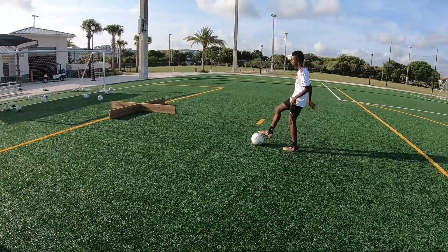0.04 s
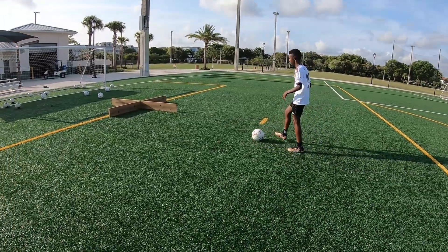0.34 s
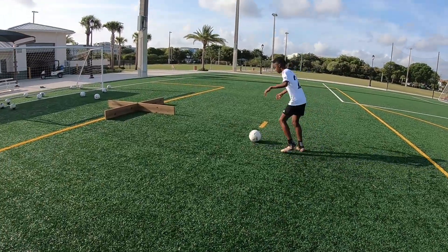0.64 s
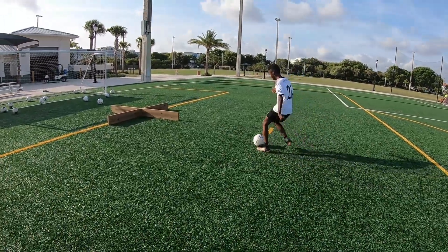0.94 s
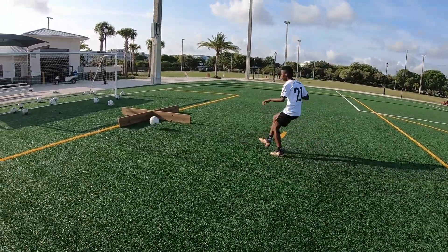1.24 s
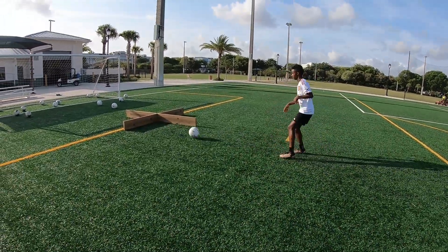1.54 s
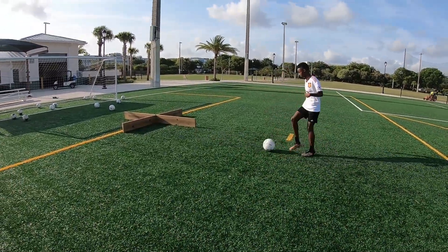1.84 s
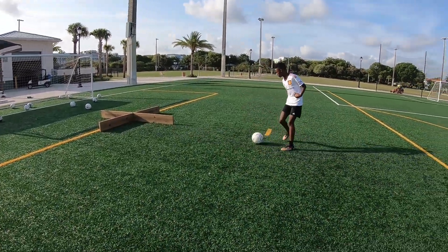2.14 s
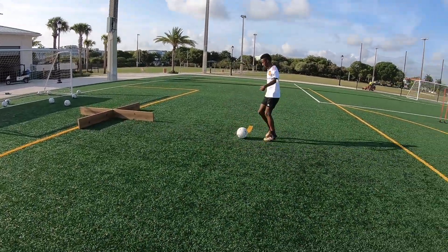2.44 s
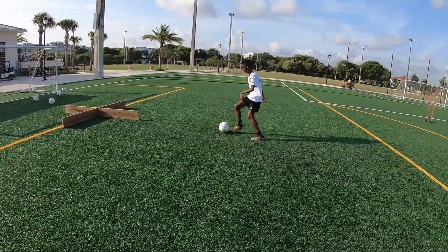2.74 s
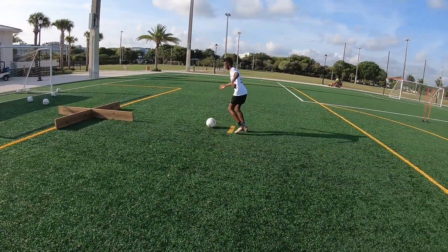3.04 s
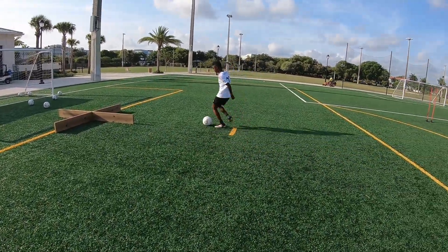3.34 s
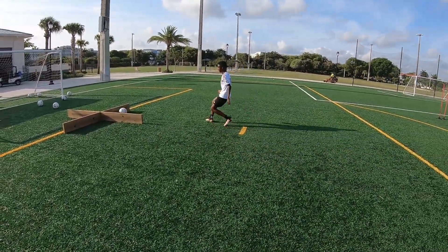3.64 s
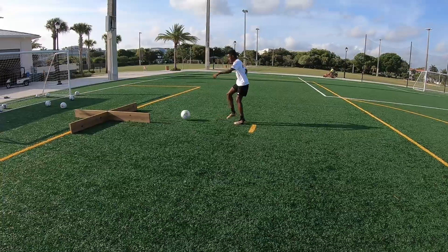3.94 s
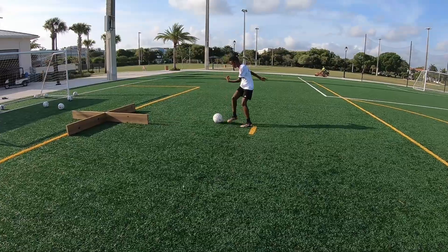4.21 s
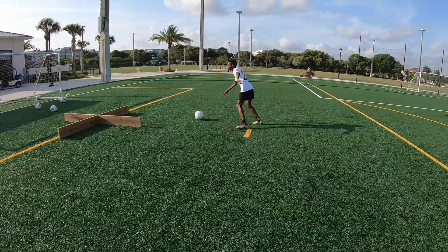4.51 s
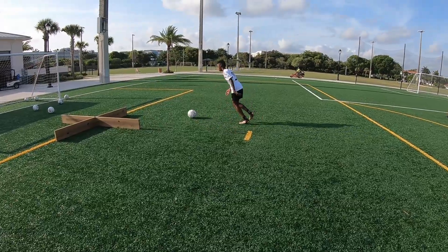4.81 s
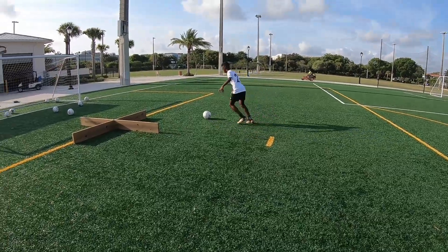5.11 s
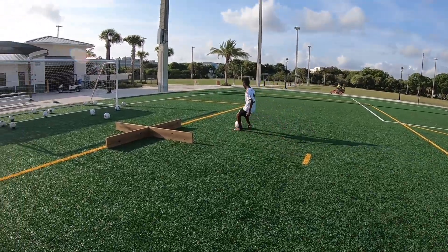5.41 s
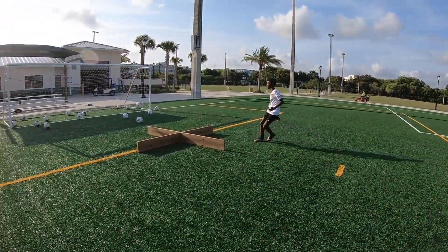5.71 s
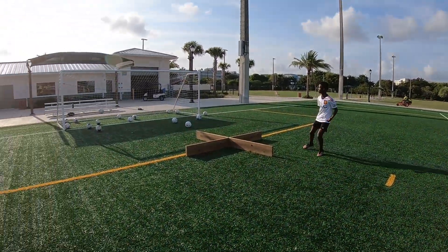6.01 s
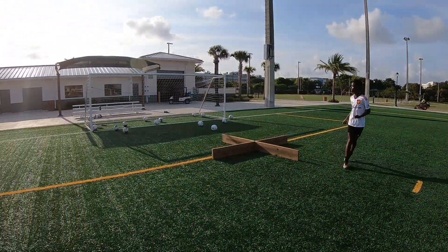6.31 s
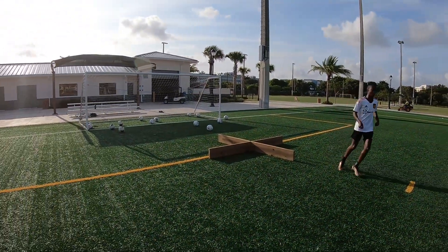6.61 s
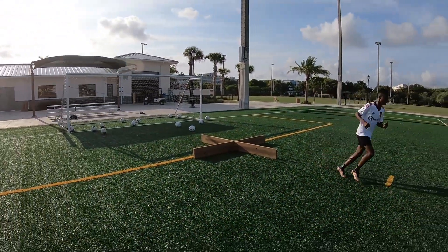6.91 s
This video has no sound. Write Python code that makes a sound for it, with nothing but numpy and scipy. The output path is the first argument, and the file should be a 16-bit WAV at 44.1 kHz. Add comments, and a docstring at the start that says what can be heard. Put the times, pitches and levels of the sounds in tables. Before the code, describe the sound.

Sharp ball kicks and two hollow wooden booms sound outdoors, with soft footsteps, gusting wind and a faraway mower.

```python
"""A football is kicked against a wooden rebound board, which booms and rattles; the player traps the return.
Each touch is a slap on the ball's skin and a short thump as it squashes. Faint echoes follow the booms.
Shoes brush and thud on the artificial turf. Across the field a mower hums, whines and clatters over
the murmur of a distant town, while gusts of wind rumble on the microphone."""
import sys
import numpy as np
from scipy import signal
from scipy.fft import rfft, irfft
from scipy.io import wavfile
from scipy.ndimage import uniform_filter1d

SR = 44100
rng = np.random.default_rng(int(sys.argv[2]) if len(sys.argv) > 2 else 0)


def store_wav(level_fs):
    """Save 16-bit WAV to argv[1]."""
    pcm = np.round(np.clip(np.atleast_2d(level_fs), -1, 1) * 32767)
    wavfile.write(sys.argv[1], SR, pcm.T.astype(np.int16))


N = 306936
TIME = np.arange(N) / SR


# Touches of the ball. Each row: start in seconds, thump level in dB, thump pitch in Hz, swell time in
# seconds, hollow ring in dB, slap level in dB, slap's low edge in Hz, its high edge in Hz,
# the tick's lower note in Hz, its boost in dB, the upper note in Hz, its boost in dB.
BALL_TOUCHES = [(1.1240, -15, 133, 0.0076, -38, -26, 900, 6300, 3960, 8, 6300, 3),
                (1.4397, -13, 144, 0.0057, -26.5, -11.5, 700, 3700, 2130, 4, 4450, 8.5),
                (1.5360, -19, 195, 0.0051, -33, -57, 1000, 2000, 2000, 0, 4000, 0),
                (2.043, -33, 98, 0.005, -64, -38.5, 1000, 6000, 1900, 9, 5700, 11),
                (3.5319, -16.5, 143, 0.0085, -40, -28.5, 2200, 9100, 4050, 7, 5400, 4),
                (3.797, -8.5, 158, 0.0079, -27, -19, 400, 7300, 1750, 10.5, 7300, -2.5),
                (4.2690, -29, 91, 0.008, -40.5, -32, 3400, 6400, 2570, 16, 4600, 2),
                (5.5666, -18.5, 123, 0.0071, -30.5, -22, 1900, 6400, 2630, 7, 3500, 10.5)]
# Tone of shoe or wood on the ball's skin. Each row: frequency in Hz, level in dB.
SLAP_COLOUR = [(300, -16), (900, -32.5), (1200, 11), (1850, 9), (2500, 4), (3300, -2), (4400, 0.5),
               (6000, -2.5), (9000, -12.5), (11000, -29), (13000, -7), (16000, -21)]
# The ball's hollow ring. Each row: pitch in Hz, level in dB, seconds to fade by 60 dB.
HOLLOW_NOTES = [(395, 6.5, 0.023), (480, -7, 0.11), (599, -11, 0.11)]

def ball(squash_turns=0.6, squash_s=0.0021, scuff_db=-21.5, scuff_s=0.0064, tick_width_hz=600):
    """The skin slaps and scuffs, then the ball squashes and springs back in a few swings."""
    out, t = np.zeros(N), np.arange(4096) / SR
    hz = np.fft.rfftfreq(len(t), 1 / SR)
    hollow = sum(ring(t, *note) for note in HOLLOW_NOTES)
    for start, thump_db, pitch, swell, hollow_db, slap_db, low, high, *tick_notes in BALL_TOUCHES:
        turns = pitch * t + squash_turns * (1 - np.exp(-t / squash_s))  # the first swing is the quickest
        thump = t / swell * np.exp(.5 - .5 * (t / swell) ** 2) * np.sin(2 * np.pi * turns)
        contact = (t == 0) + amp(scuff_db) * np.exp(-t / scuff_s) * rng.standard_normal(len(t))
        lower, lower_db, upper, upper_db = tick_notes
        tick = amp(lower_db * bell(hz, lower, tick_width_hz) + upper_db * bell(hz, upper, tick_width_hz))
        band = cut_bass(hz, low) * cut_treble(hz, high, steepness=3)
        click = sharpest_click(colour(SLAP_COLOUR, hz) * tick * band)
        slap = signal.fftconvolve(contact, click / abs(click).max())[:len(t)]
        add(out, start, amp(thump_db) * thump + amp(hollow_db) * hollow + amp(slap_db) * slap)
    return out


# Blows on the board. Each row: start in seconds, force in dB, high edge in Hz, plank (0 or 1).
BOARD_BLOWS = [(1.4460, 0, 2530, 0), (1.562, 3, 195, 0), (3.8, 1.5, 2500, 1)]
# The board's natural notes. Each row: pitch in Hz, seconds to fade by 60 dB,
# level in dB when plank 0 is hit, level in dB when plank 1 is hit.
BOARD_NOTES = [(163.2, 0.25, -20, -20), (195, 0.36, -28.5, -22), (226, 0.15, -13.5, -4.5),
               (246.4, 0.38, -24, -23.5), (340, 0.27, -22.5, -16.5), (430, 0.2, -19.5, -19),
               (450, 0.56, -29, -36), (491, 0.14, -26.5, -29), (564, 0.1, -25, -22), (633, 0.11, -35, -23),
               (676, 0.29, -31.5, -41), (662, 0.17, -35, -23.5), (700, 0.27, -30.5, -29),
               (829, 0.2, -43, -24), (880, 0.15, -47, -23), (895, 0.099, -32, -30),
               (1149, 0.21, -45, -31.5), (1270, 0.16, -48, -26.5), (1300, 0.16, -40, -36.5),
               (1320, 0.23, -42, -32), (1378, .14, -51, -35), (1720, 0.11, -54, -39),
               (1970, 0.14, -50, -47), (2200, .13, -63, -47.5)]

def board(rise_s=0.03, rise_corner_hz=330):
    """The planks ring as the ball leans in, high notes first; where and how hard it hits sets the mix."""
    out, t = np.zeros(N), np.arange(SR) / SR
    for start, force_db, high, plank in BOARD_BLOWS:
        for hz, fade_s, *plank_db in BOARD_NOTES:
            swell = 1 - np.exp(-t / rise_s * (1 + hz / rise_corner_hz))
            note = ring(t, hz, force_db + plank_db[round(plank)], fade_s)
            add(out, start, swell * note * cut_treble(hz, high, steepness=4))
    return out


# Knocks after a blow. Each row: start in seconds, level in dB, high edge in Hz.
PLANK_KNOCKS = [(1.457, -23, 750), (1.477, -30, 480), (1.533, -28, 560), (1.584, -32, 520),
                (1.63, -28, 230), (3.806, -21, 1360), (3.836, -19, 600), (3.864, -22, 430),
                (3.889, -29.5, 555), (3.922, -25.5, 240)]

def rattles(low_hz=150, fade_s=0.12, rise_s=0.0073):
    """Loose planks knock together, each knock a quickly dying burst of dull noise."""
    out, t = np.zeros(N), np.arange(SR // 4) / SR
    envelope = (1 - np.exp(-t / rise_s)) * fade(t, fade_s)
    for start, db, high in PLANK_KNOCKS:
        wood = noise(lambda f: cut_bass(f, low_hz) * cut_treble(f, high, steepness=4), size=len(t))
        add(out, start, amp(db) * wood * envelope)
    return out


# Echoes of the board. Each row: start in seconds, level in dB, pitch in Hz,
# climb in Hz per second, width in Hz, length in seconds.
FAR_ECHOES = [(1.689, -47.5, 504, 903, 40.2, 0.075), (1.769, -53.5, 560, 1302, 70, .11),
              (4.045, -39.5, 376, -1000, 90.5, 0.0336)]

def echoes():
    """The far side of the field returns the boom as faint smears of gliding pitch."""
    out = np.zeros(N)
    for start, db, hz, climb, width, length in FAR_ECHOES:
        t = np.arange(0, length, 1 / SR)
        blur = narrow_noise(hz, width, size=SR)[:len(t)]
        glide = (signal.hilbert(blur) * np.exp(1j * np.pi * climb * t ** 2)).real
        add(out, start, amp(db) * unit(glide) * signal.windows.tukey(len(t), .5))
    return out


# Heavy steps. Each row: start in seconds, level in dB, pitch in Hz, swell time in seconds.
HEAVY_STEPS = [(2.926, -24.5, 99, 0.0039), (4.488, -19.5, 166, .0026), (4.521, -24.5, 176, 0.0085),
               (4.695, -28, 183, 0.005), (4.822, -26.5, 162, .0065), (4.915, -22.5, 173, 0.006),
               (5.258, -28, 440, 0.0011), (5.884, -24.5, 175.6, 0.0086), (6.885, -26, 106, 0.0077)]

def footfalls():
    """The padded ground gives under a planted foot: a soft, low thud."""
    out, t = np.zeros(N), np.arange(SR // 4) / SR
    for start, db, pitch, swell in HEAVY_STEPS:
        envelope = t / swell * np.exp(1 - t / swell)
        add(out, start, amp(db) * envelope * np.sin(2 * np.pi * pitch * t))
    return out


# Sliding shoes. Each row: start in seconds, brush level in dB, length in seconds, scrape level in dB.
SHOE_SLIDES = [(0.2, -65.5, 0.73, -79), (1.11, -63, 0.2, -85), (2.475, -61.5, 0.38, -66),
               (3.2, -60, 0.61, -72), (3.82, -59.5, 0.47, -70), (4.424, -55, 0.35, -54.5),
               (4.78, -61, 0.3, -62), (5.03, -57.5, 0.26, -70), (5.275, -61, 0.2, -66),
               (5.74, -57, 0.17, -56.5), (5.954, -60, 0.31, -81), (6.276, -59, 0.12, -51),
               (6.44, -66, 0.18, -61.5), (6.59, -68, 0.13, -52.5), (6.78, -68, 0.19, -57.5)]
# Tone of the brushed grass and of the scraping studs. Each row: frequency in Hz, level in dB.
GRASS_COLOUR = [(600, -10), (2000, -11), (3300, 0.5), (4600, 12.5), (5400, 6), (7000, 2), (9500, -14.5),
                (11200, -28), (12400, -13), (15500, -24)]
STUD_COLOUR = [(500, -14), (1000, 1), (1900, 1), (2900, -0.5), (4000, -4), (6000, -15.5), (11000, -37.5)]

def shoe_scuffs(flicks_per_s=1700, spread_db=1.0):
    """Plastic grass blades flick back under a shoe, while its studs scrape the grains between them."""
    brush, scrape = np.zeros(N), np.zeros(N)
    for start, brush_db, length, scrape_db in SHOE_SLIDES:
        press = np.hanning(round(length * SR))
        add(brush, start, amp(brush_db) * press)
        add(scrape, start, amp(scrape_db) * press)

    def crackle(tone):
        strength = amp(spread_db * np.minimum(rng.exponential(1, N), 4)) * rng.standard_normal(N)
        flicks = strength * (rng.random(N) < flicks_per_s / SR)
        return filtered(flicks, lambda f: colour(tone, f))
    return brush * crackle(GRASS_COLOUR) + scrape * crackle(STUD_COLOUR)


# Tones of the exhaust and the gears. Each row: multiple of the engine's firing rate, level in dB.
EXHAUST_TONES = [(2, -25.5), (4, -14), (5, -2), (7, -18.5), (8, -12.5), (10, -18), (12, -18)]
GEAR_TONES = [(53, -25), (54, -7), (72, -18.5)]
# Tone of the hiss. Each row: frequency in Hz, level in dB.
HISS_COLOUR = [(1500, -24.5), (3300, 2.5), (5100, 13.5), (6500, -2), (8000, -8.5), (9900, -11),
               (10800, -19), (12200, -10), (15500, -23.5)]
# How each part of the mower swells and fades. Each row: time in seconds, level in dB.
EXHAUST_LEVELS = [(0, -38), (.8, -40.5), (1.3, -53), (2, -51), (2.8, -56), (3.4, -45), (4.6, -44.5),
                  (5.8, -44.5), (6.96, -38.5)]
GEAR_LEVELS = [(0, -68), (1.2, -68.5), (1.7, -56.5), (2.2, -60), (3, -57.5), (5.5, -56.5), (6, -59),
               (6.96, -91)]
HISS_LEVELS = [(0, -69), (4.3, -83), (4.6, -65), (4.8, -72), (5.62, -67), (5.78, -59), (6.1, -58.5),
               (6.66, -59), (6.76, -82), (6.96, -63)]
CLATTER_LEVELS = [(0, -67.5), (1.3, -59.5), (1.6, -54.5), (2.05, -54.5), (2.25, -57), (2.8, -56),
                  (4.3, -55.5), (5.3, -52.5), (5.9, -52), (6.08, -55), (6.25, -52.5), (6.45, -49.5),
                  (6.96, -54)]

def mower(firing_hz=30.24, wobble=0.00129, gear_rough=0.3, puff_db=-4.0, muffler_hz=172):
    """The engine's firing sets the exhaust hum, the gear whine and the throb of hiss and clatter."""
    turns = np.cumsum(firing_hz * (1 + wobble * drift(2.94))) / SR
    throb = amp(1.8 * np.tanh(5 * np.cos(2 * np.pi * turns)))  # louder for half of each cycle
    puffs = amp(puff_db) * throb * narrow_noise(muffler_hz, half_width_hz=45)  # gas swirls in the muffler
    exhaust = (engine_tones(turns, EXHAUST_TONES, waver=0.3) + puffs) * level(EXHAUST_LEVELS)
    gears = engine_tones(turns, GEAR_TONES, waver=0.15)
    whine = gears * throb * (1 + gear_rough * drift(78)) * level(GEAR_LEVELS)
    hiss = unit(noise(lambda f: colour(HISS_COLOUR, f)) * throb) * level(HISS_LEVELS)
    clatter = unit(casing() * throb) * level(CLATTER_LEVELS)
    return exhaust + whine + hiss + clatter


def engine_tones(turns, tones, waver):
    """Wavering tones at multiples of the firing rate."""
    out = np.zeros(N)
    for multiple, db in tones:
        strength = amp(db) * (1 + waver * drift(4.2))
        out += strength * np.cos(2 * np.pi * (round(multiple) * turns + rng.random()))
    return np.sqrt(2) * out


# Tone of the clatter. Each row: frequency in Hz, level in dB.
CLATTER_COLOUR = [(500, 6.5), (1200, 8.5), (1750, 9), (2200, 2), (3450, -0.5), (4200, 3.5), (5300, 1.5),
                  (6500, -7), (8200, -11.5), (10000, -25), (11200, -38), (12400, -25.5), (15500, -37)]
# Where the mower's casing rings. Each row: pitch in Hz, width in Hz, boost in dB.
CASING_PEAKS = [(1794, 130, 2.5), (2550, 480, 4), (4070, 420, 4), (5560, 180, -0.5), (6100, 120, 6),
                (6500, 83, 7.5), (7660, 200, 2.5)]

def casing(ripple_depth_db=3.5, full_ripple_hz=3000):
    """Noise rings in the casing, with fine ripples in its tone that shift as the mower moves."""
    hz, _, slices = to_slices(rng.standard_normal(N), size=1024)
    boost_db = sum(db * bell(hz, centre, width) for centre, width, db in CASING_PEAKS)
    tone = colour(CLATTER_COLOUR, hz) * amp(boost_db)
    ripple = uniform_filter1d(rng.standard_normal(slices.shape), size=2, axis=0)  # smooth across pitch
    ripple = unit(uniform_filter1d(ripple, size=170, axis=1))  # and across time
    ripple_db = ripple_depth_db * np.minimum(hz / full_ripple_hz, 1) * ripple
    return from_slices(slices * tone * amp(ripple_db), size=1024)


# How the squeal grows. Each row: time in seconds, level in dB.
SQUEAL_LEVELS = [(0, -87.5), (4.3, -69), (6.4, -69), (6.7, -63.5), (6.96, -61)]

def squeal(pitch_hz=3100):
    """A thin, fuzzy whistle from the mower."""
    return narrow_noise(pitch_hz, half_width_hz=26) * level(SQUEAL_LEVELS)


# Gusts. Each row: time in seconds, level in dB, high edge of the rumble in Hz.
GUSTS = [(0, -64, 90), (.68, -52, 89.5), (.86, -42, 100), (1.08, -40.5, 109.5), (1.3, -45, 110),
         (2, -43.5, 110), (2.2, -48, 109), (2.94, -32.5, 129), (3.06, -47.5, 169), (3.5, -34, 240),
         (3.63, -42.5, 210), (3.76, -30, 225), (3.97, -37, 191), (4.18, -39, 196), (4.3, -35, 286),
         (4.43, -39.5, 224), (4.6, -34, 283), (4.68, -48, 170), (4.86, -40, 169), (4.98, -29.5, 254),
         (5.15, -31.5, 259), (5.27, -29, 350), (5.34, -33, 260), (5.45, -34, 260), (5.66, -44, 161),
         (5.8, -36, 190), (6.05, -37, 195), (6.22, -35, 149), (6.4, -46, 150), (6.96, -40.5, 159)]
# Tone of the wind. Each row: frequency in Hz, level in dB.
WIND_COLOUR = [(20, -18.5), (60, 3), (110, 3.5), (175, 1), (240, 0), (320, -3.5), (600, -3.5), (2000, -3)]

def wind(steepness=2.97, lumps_db=2.1):
    """Air swirls at the microphone: a lumpy rumble that reaches higher in the sharp gusts."""
    hz, t, slices = to_slices(rng.standard_normal(N))
    times, db, high = np.transpose(GUSTS)
    tone = colour(WIND_COLOUR, hz) * cut_treble(hz, np.interp(t, times, high), steepness)
    rumble = from_slices(slices * tone / np.linalg.norm(tone, axis=0))
    return unit(rumble * amp(lumps_db * drift(30))) * amp(np.interp(TIME, times, db))


# Tone of the town. Each row: frequency in Hz, level in dB.
TOWN_COLOUR = [(20, -10), (58, 12), (100, -4.5), (170, -1.5), (300, -5), (430, -11.5), (800, -14.5),
               (1300, -20.5), (2000, -27), (4000, -36), (9000, -76)]

def town(db=-44.0):
    """A distant town blurs into a steady, low murmur."""
    return amp(db) * noise(lambda f: colour(TOWN_COLOUR, f))


# The band the ground changes. Each row: time in seconds, change in dB (below 0 is a dip), centre in Hz.
GROUND_BAND = [(0, -4.5, 498), (1.1, 1.5, 480), (1.85, -7, 445), (2.7, -8.5, 490), (3.05, 1.5, 600),
               (4.1, -5.5, 680), (4.8, -3, 506), (5.7, -2.5, 497)]

def over_turf(sound, width_hz=230):
    """Far sound meets its own bounce off the ground, which dips or slightly lifts a shifting band."""
    hz, t, slices = to_slices(sound)
    times, db, centre = np.transpose(GROUND_BAND)
    change_db = np.interp(t, times, db) * bell(hz, np.interp(t, times, centre), width_hz)
    return from_slices(slices * amp(change_db))


def amp(db):
    """Turns decibels into a number to multiply by."""
    return 10 ** (np.asarray(db) / 20)


def unit(x):
    """Scales a signal to an average strength (rms) of 1."""
    return x / np.sqrt(np.mean(x ** 2) + 1e-20)


def level(points):
    """Gain over time from rows of seconds and dB."""
    return amp(np.interp(TIME, *np.transpose(points)))


def colour(points, hz):
    """Gain over frequency from rows of Hz and dB."""
    f, db = np.transpose(points)
    return amp(np.interp(np.log(hz + 1), np.log(f), db))


def bell(hz, centre, width):
    """A peak of height 1 around one frequency."""
    return 1 / (1 + (2 * (hz - centre) / width) ** 2)


def cut_bass(hz, edge):
    """Gain that falls away below the edge."""
    return hz ** 2 / (hz ** 2 + edge ** 2)


def cut_treble(hz, edge, steepness):
    """Gain that falls away above the edge."""
    return 1 / np.hypot(1, (hz / edge) ** steepness)


def fade(t, fade_s):
    """Dies away by 60 dB every fade_s seconds."""
    return np.exp(-np.log(1000) * t / fade_s)


def ring(t, hz, db, fade_s):
    """One dying note."""
    return amp(db) * fade(t, fade_s) * np.sin(2 * np.pi * hz * t)


def add(mix, start, sound):
    """Mixes a sound in at a start time in seconds."""
    part = mix[round(start * SR):][:len(sound)]
    part += sound[:len(part)]


def filtered(x, shape):
    """Gives a signal the tone shape(Hz) and a strength of 1."""
    return unit(irfft(rfft(x) * shape(np.fft.rfftfreq(len(x), 1 / SR)), len(x)))


def noise(shape, size=N):
    """Noise with the tone shape(Hz)."""
    return filtered(rng.standard_normal(size), shape)


def narrow_noise(hz, half_width_hz, size=N):
    """Noise gathered around one pitch."""
    return noise(lambda f: bell(f, hz, 2 * half_width_hz), size)


def drift(rate_hz):
    """Smooth random wandering."""
    return noise(lambda f: np.exp(-(f / rate_hz) ** 2))


def sharpest_click(gain):
    """The shortest click with the given gain at each frequency."""
    log_gain = np.log(np.maximum(np.r_[gain, gain[-2:0:-1]], 1e-5))
    return np.fft.ifft(np.exp(np.conj(signal.hilbert(log_gain)))).real


def to_slices(x, size=2048):
    """Cuts sound into short overlapping slices; returns frequencies, times and each slice's spectrum."""
    hz, t, slices = signal.stft(x, SR, nperseg=size, noverlap=size * 3 // 4)
    return hz[:, None], t, slices


def from_slices(slices, size=2048):
    """Joins the slices back into sound."""
    return signal.istft(slices, SR, nperseg=size, noverlap=size * 3 // 4)[1][:N]


def scene():
    """Ball, board and player in front of the mower, the town and the wind."""
    play = ball() + board() + rattles() + echoes() + shoe_scuffs() + footfalls()
    far_away = over_turf(town() + mower() + squeal())
    return (play + far_away + wind())[None]


def record(dry, cutoff_hz=15750):
    """Cuts off the very highest treble."""
    low_pass = signal.firwin(511, cutoff_hz, window=("kaiser", 9), fs=SR)
    return signal.oaconvolve(dry, low_pass[None], "same")


dry = scene()
out = record(dry)
store_wav(out)
```